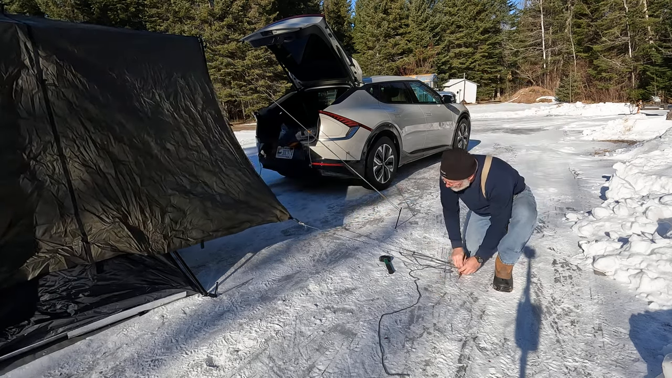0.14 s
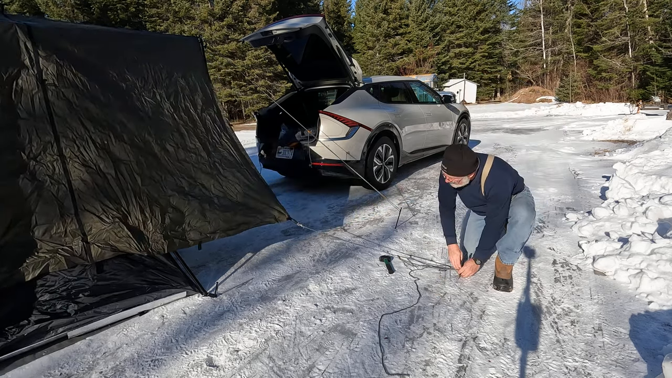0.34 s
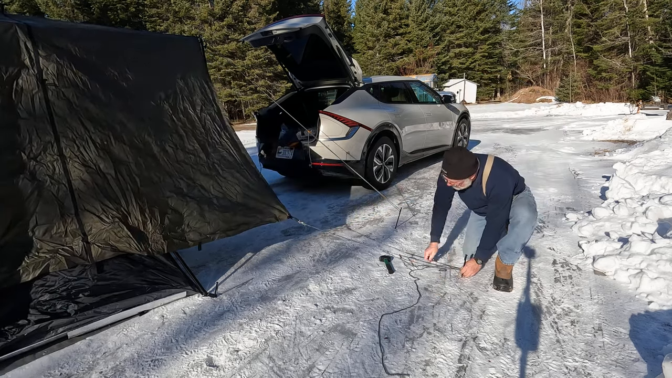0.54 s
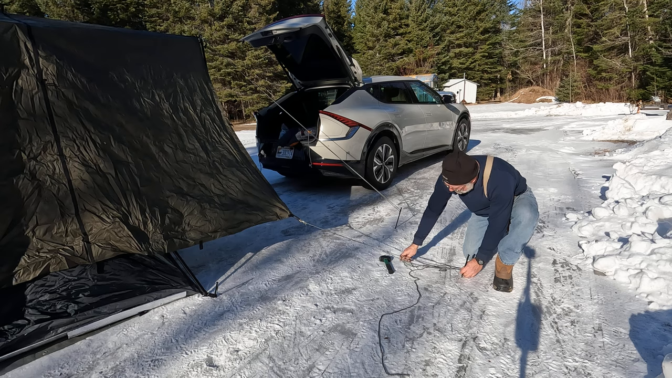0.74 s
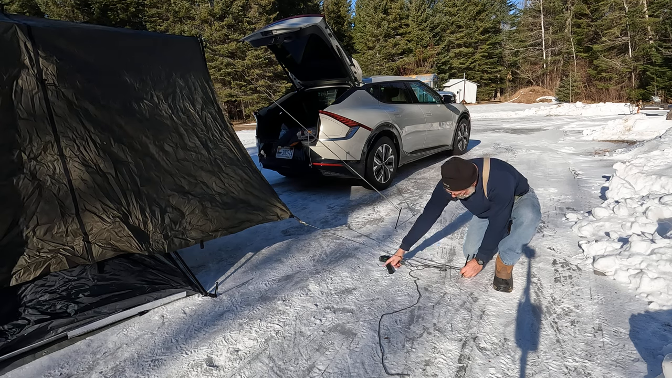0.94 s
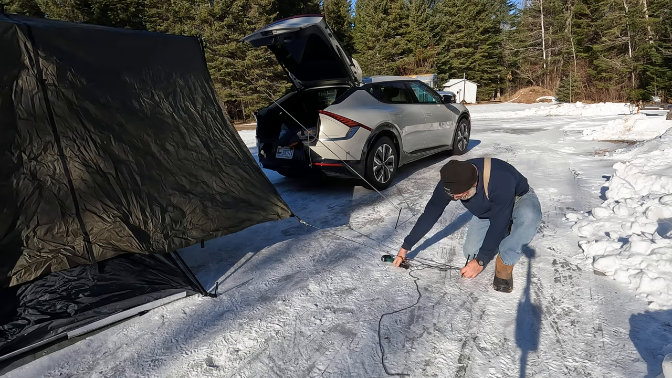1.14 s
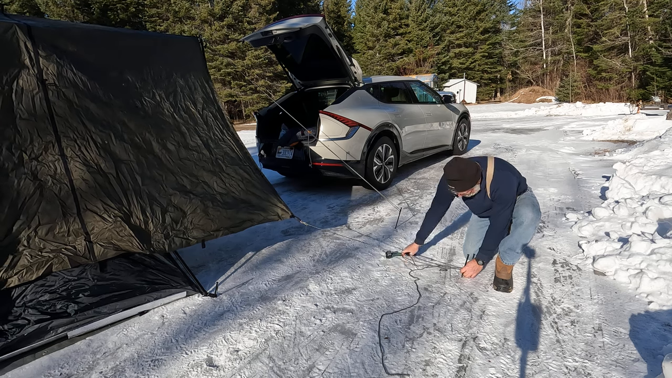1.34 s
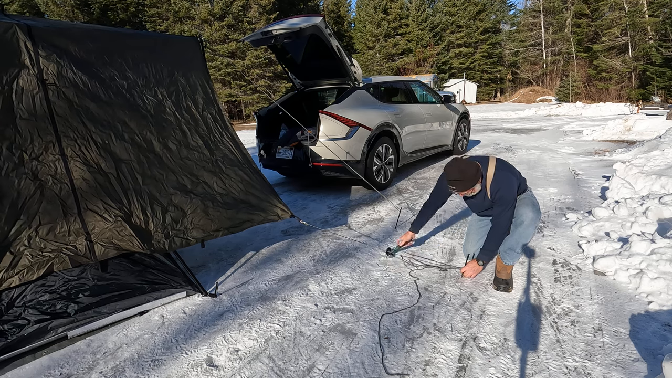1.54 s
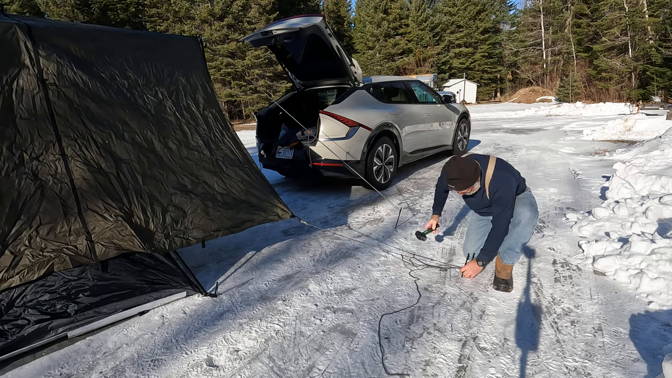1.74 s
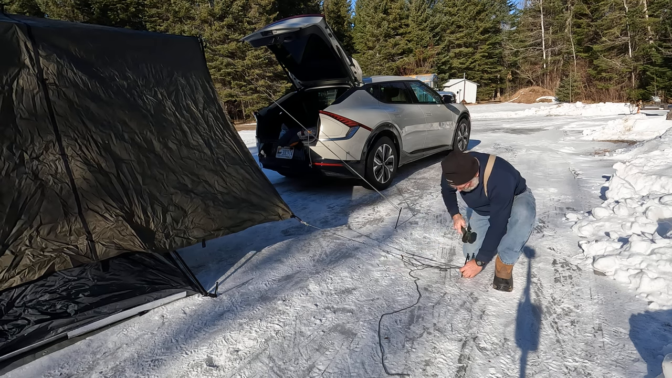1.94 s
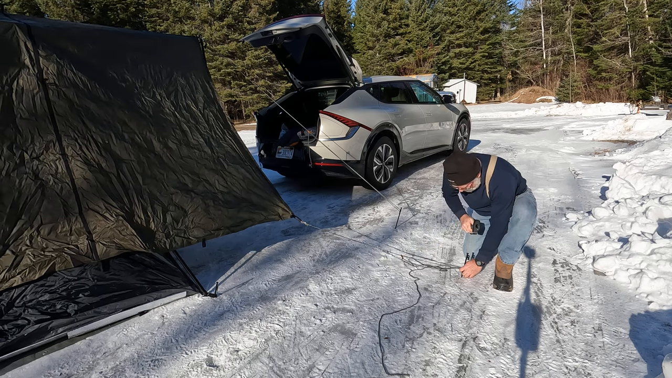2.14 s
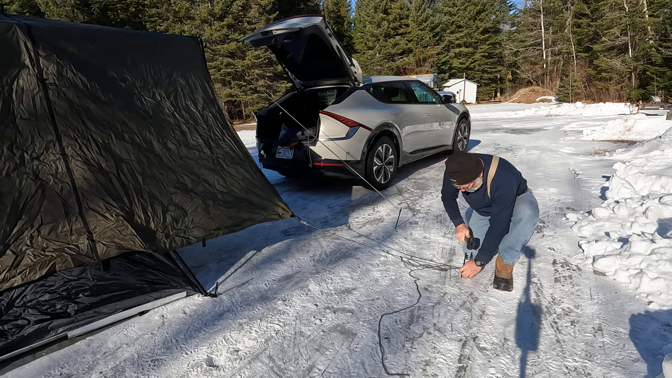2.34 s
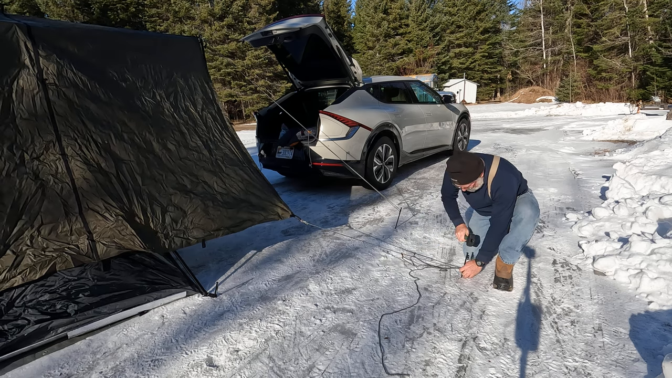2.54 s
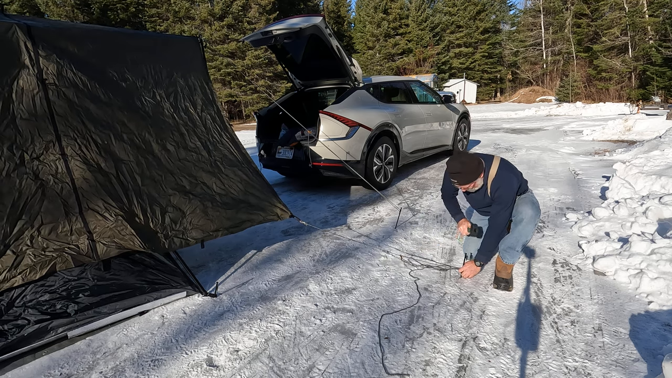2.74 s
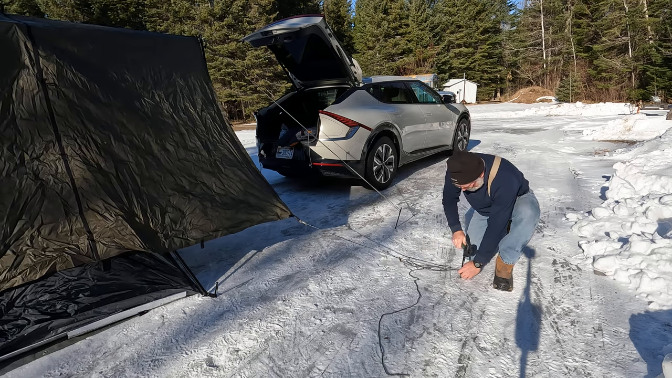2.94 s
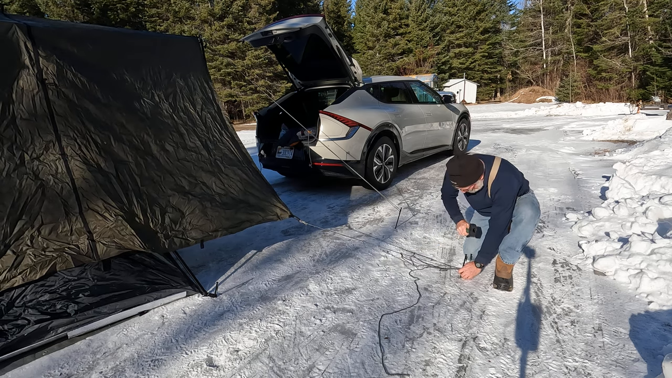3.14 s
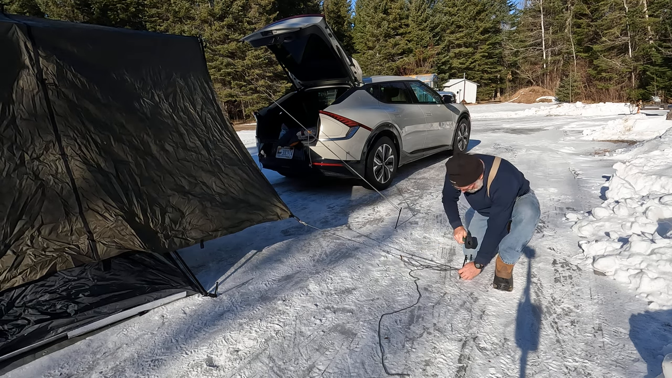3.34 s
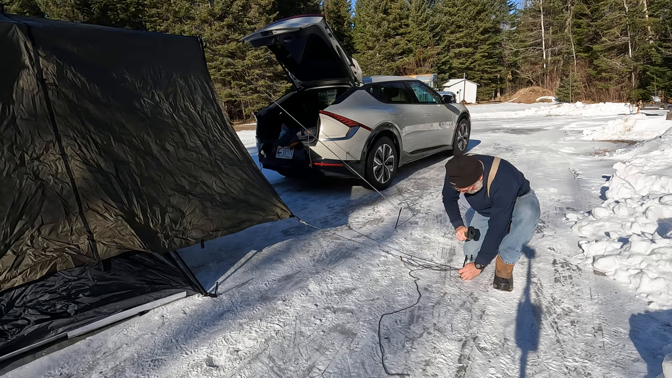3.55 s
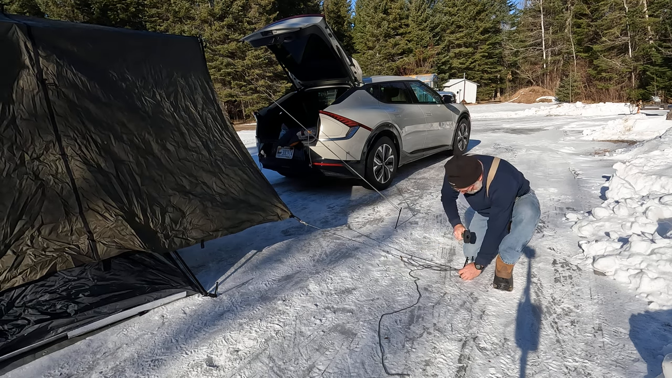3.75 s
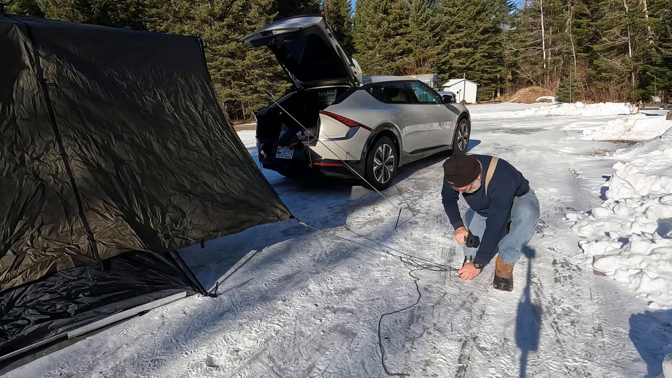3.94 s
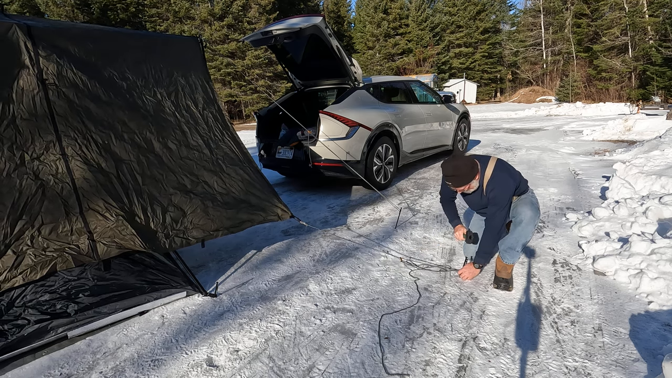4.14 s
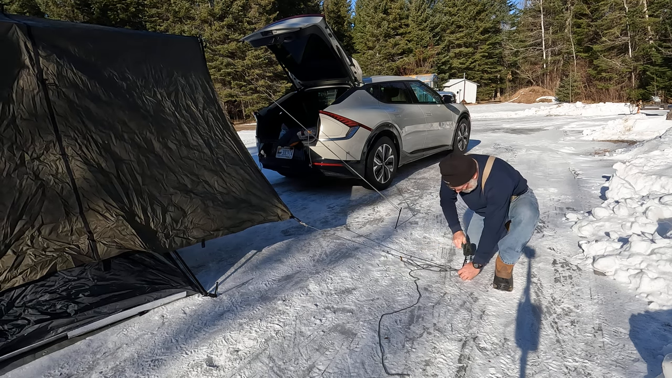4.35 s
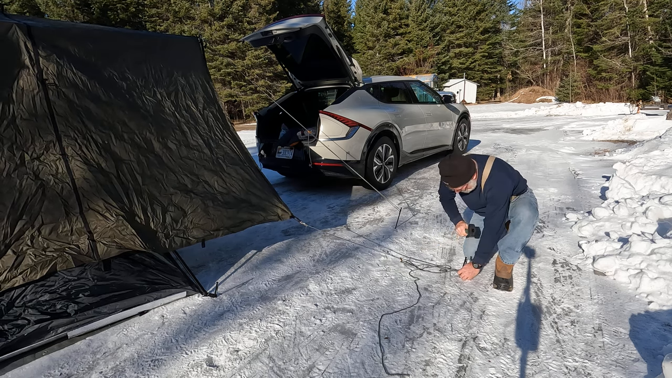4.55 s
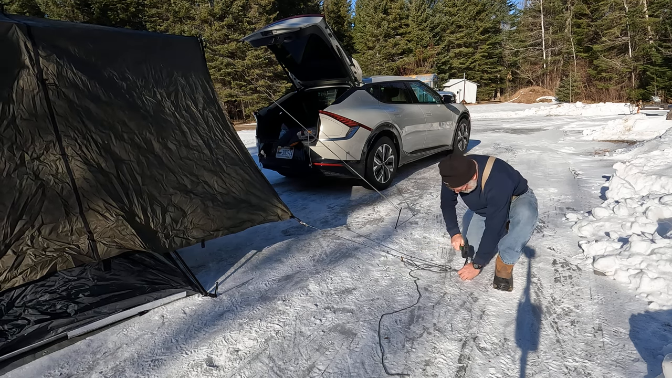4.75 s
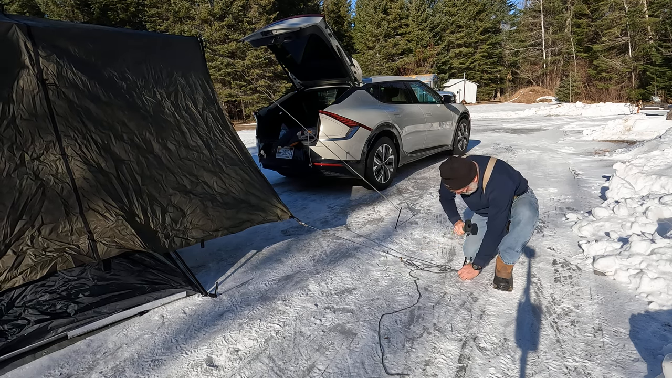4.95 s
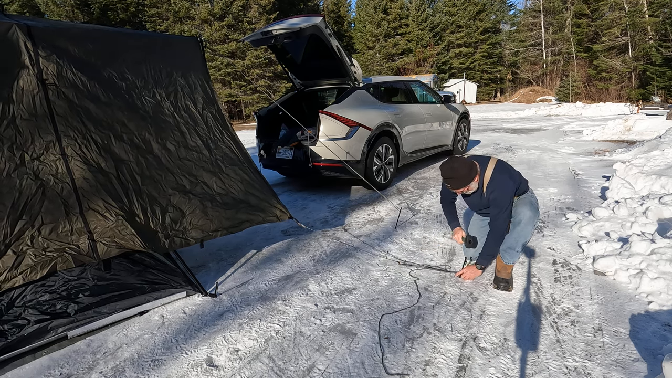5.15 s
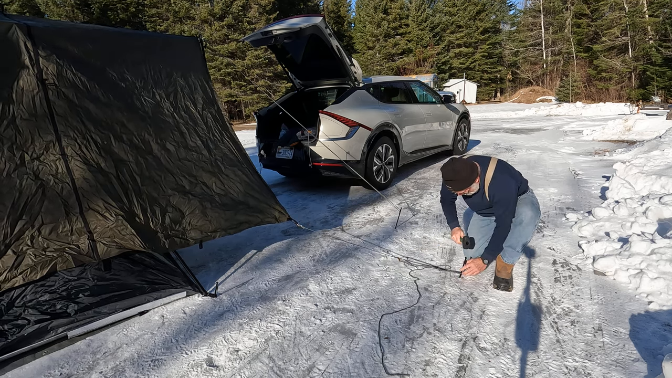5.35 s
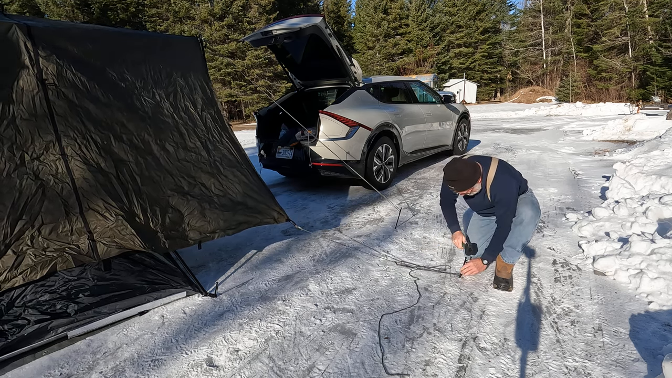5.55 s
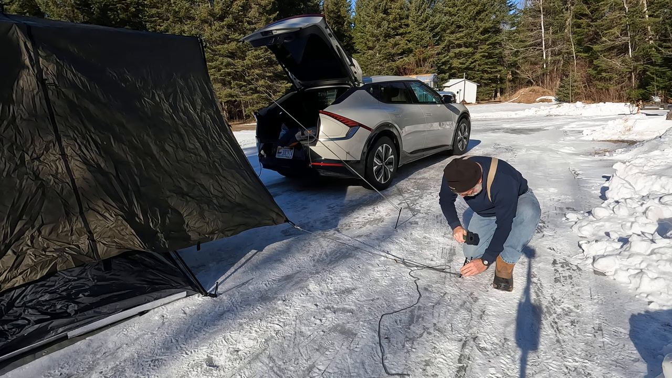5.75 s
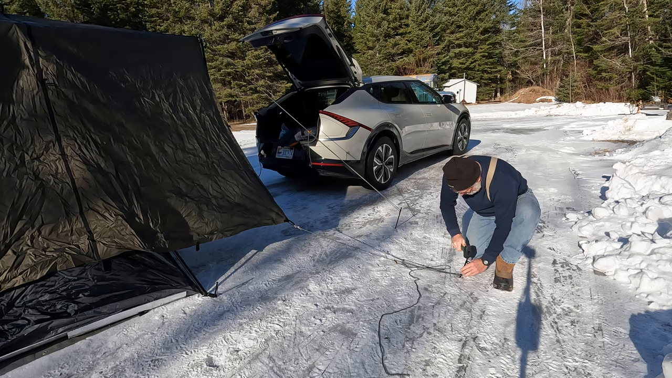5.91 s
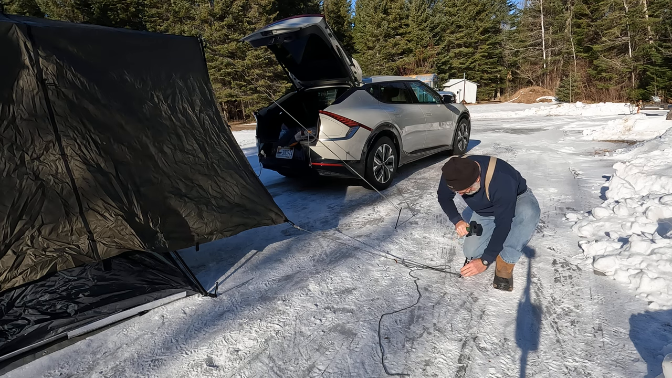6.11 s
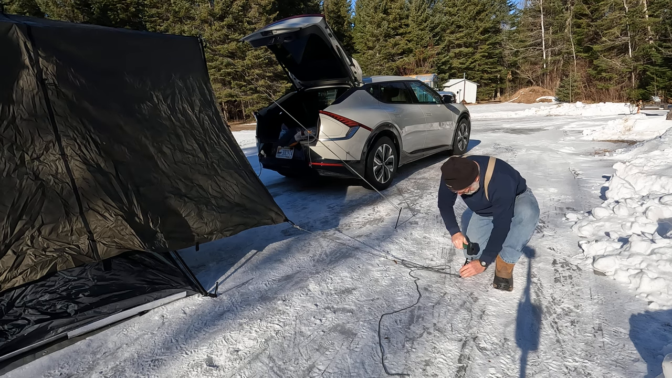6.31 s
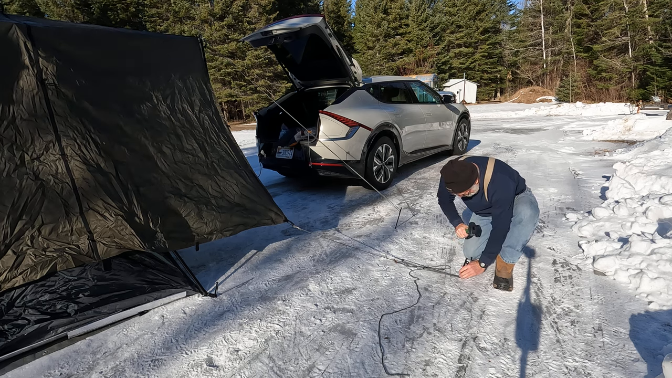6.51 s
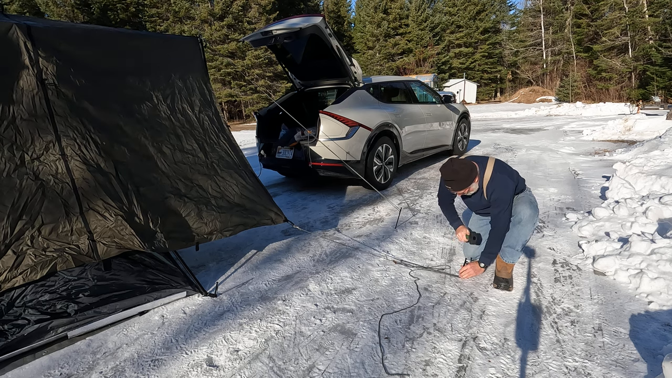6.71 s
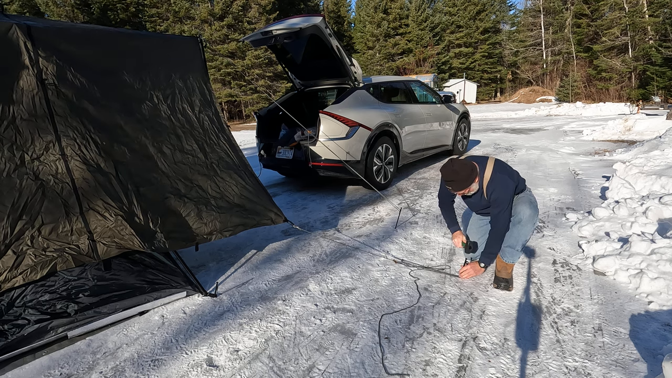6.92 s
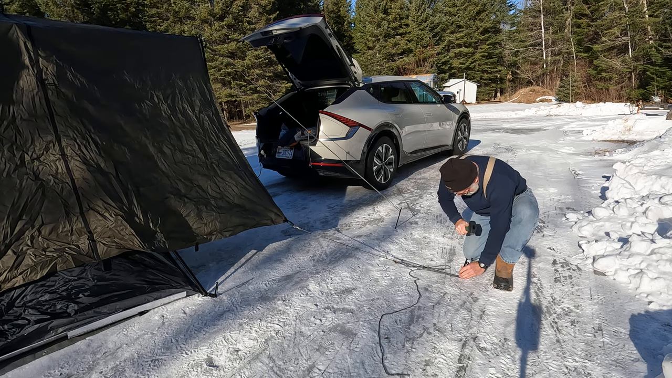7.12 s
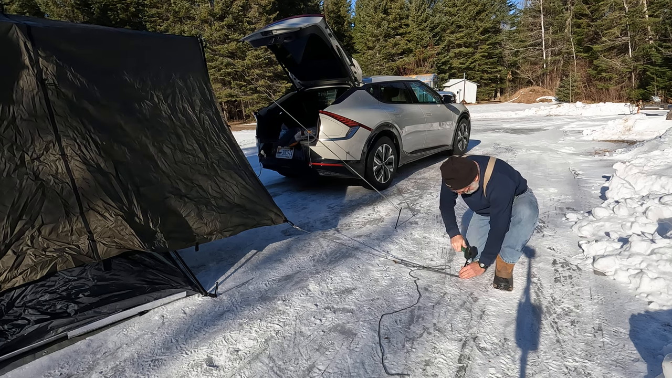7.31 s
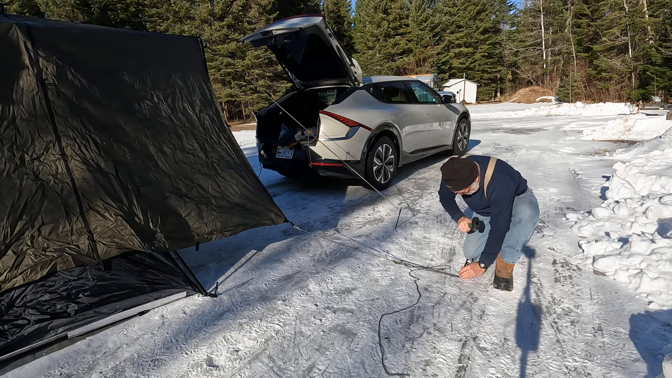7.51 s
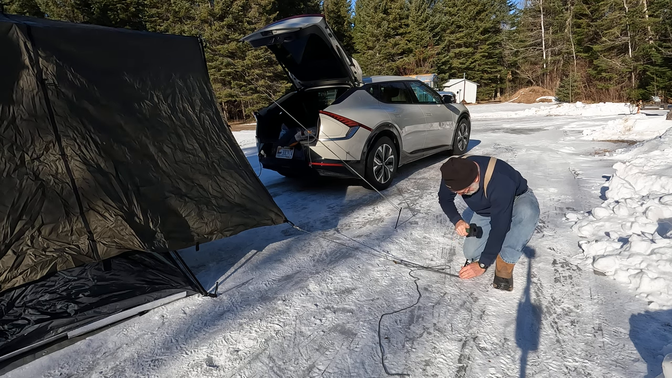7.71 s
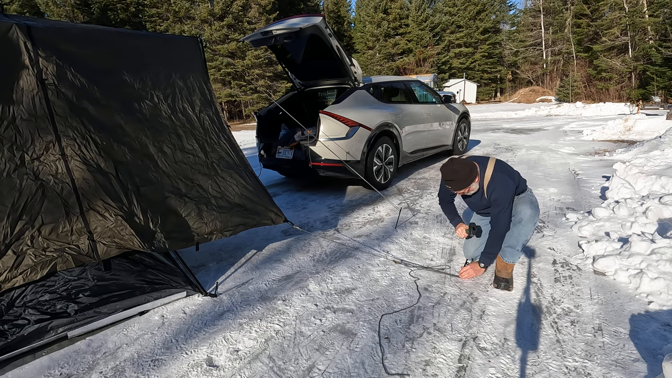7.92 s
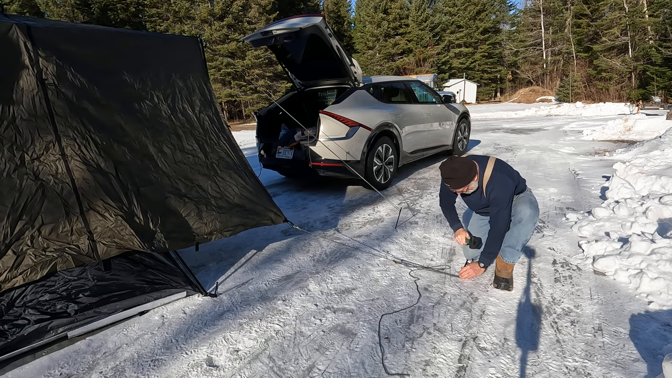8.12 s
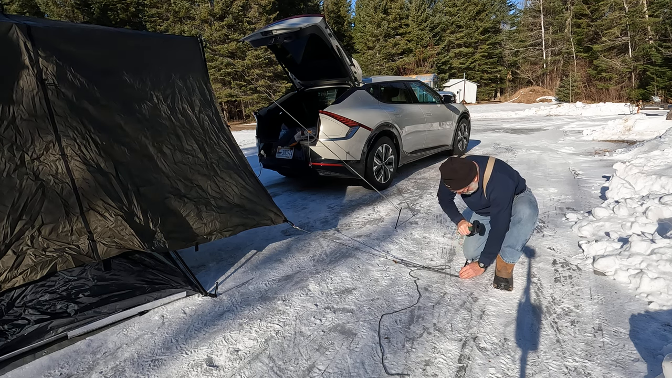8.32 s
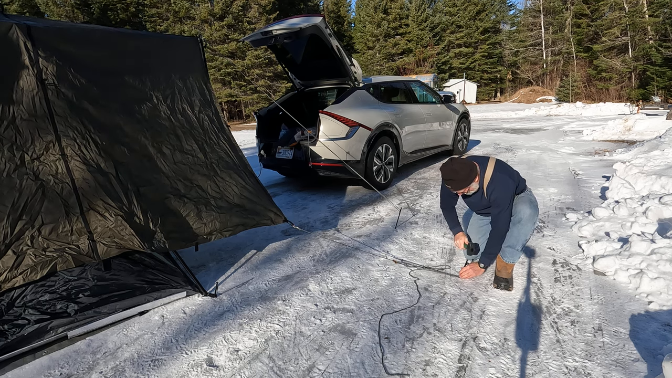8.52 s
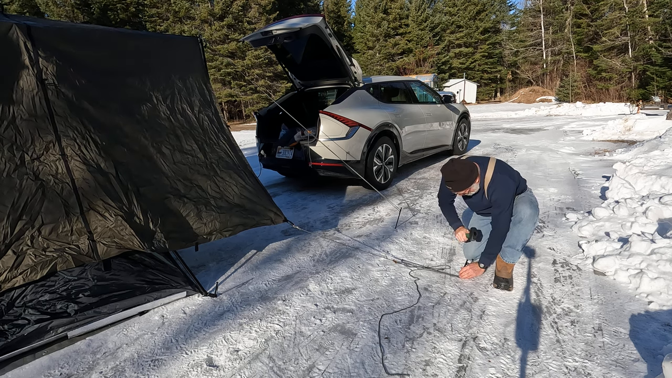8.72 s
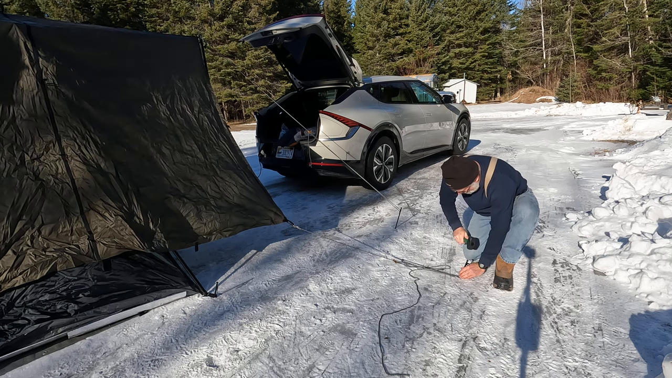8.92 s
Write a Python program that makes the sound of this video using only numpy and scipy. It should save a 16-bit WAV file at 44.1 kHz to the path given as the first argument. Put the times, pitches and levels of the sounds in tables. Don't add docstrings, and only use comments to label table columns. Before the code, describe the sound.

In an open snowy yard with far traffic humming, sleeves rustle, crust snaps and a hammer head scrapes briefly over ice. Then eight loud steel blows hit a stake, a pause brings crunching snow, five more follow, ice chips patter, and three last blows land. The close microphone distorts on each hit, on the left only; the right carries faint hiss.

```python
import sys
import numpy as np
from scipy import signal
from scipy.fft import rfft, irfft
from scipy.io import wavfile
from scipy.ndimage import uniform_filter1d

SR = 44100
rng = np.random.default_rng(int(sys.argv[2]) if len(sys.argv) > 2 else 0)


def bounce(signal):
    frames = np.transpose(np.atleast_2d(signal))
    limited = np.clip(frames, -1, 1)
    pcm = np.round(limited * 32767).astype(np.int16)
    wavfile.write(sys.argv[1], SR, pcm)


def boost_factor(decibels):
    exponent = np.asarray(decibels, float) / 20
    return 10 ** exponent


N = 395577
T = np.arange(N) / SR

# start [s], contact time [s], force over the overload point [dB],
# ground give [dB], crack [dB].
BLOWS = [(2.3498, 0.0037, 2.5, -26.5, -9.5), (2.6564, 0.01, 6, -26.5, -6), (2.9669, .0075, 11, -20, -6.5),
         (3.3212, .0056, 12.5, -25.5, -7), (3.6733, .0065, 13.5, -27.5, -3.5), (4.06, 0.0053, 12, -27, -5),
         (4.436, 0.0035, 14, -27, -2.5), (4.801, 0.0041, 12, -25.5, -2), (5.961, .0023, 9.5, -18.5, -4),
         (6.309, 0.0049, 10.5, -22.5, -3), (6.6731, .0033, 11, -17.5, -4), (7.012, 0.003, 14, -14, -3),
         (7.3712, .004, 13, -10, -3), (8.077, 0.004, 8.5, -8.5, -3), (8.5032, 0.0049, 10, -5, -3.5),
         (8.8598, .0048, 8, -7.5, -5.5)]
# low, middle and high mode [Hz],
# low mode level [dB], middle mode level [dB].
STAKE_RING = [(870, 1507, 4026, -2, 3.5), (907, 1528, 2497, 4.5, 5.5), (1098, 1700, 3660, 7.5, -2.5),
              (1210, 1500, 3000, 4, 3.5), (1286, 2142, 2670, 3, -4), (1098, 1636, 3500, -0.5, 1.5),
              (1320, 1550, 2400, -3, -2), (1640, 5700, 5146, 0, -3.5), (1750, 2153, 10023, -4.5, -4.5),
              (2110, 3800, 11000, -3.5, -6), (1290, 1400, 4489, -0.5, 0.5), (1625, 3100, 6700, -3.5, -2.5),
              (656, 2164, 3600, -2, 2), (680, 2368, 4000, 0, -0.8), (960, 1500, 2336, 5, -2),
              (846, 2400, 3531, 4, 0)]
# mode [Hz], level [dB].
CONTACT_MODES = [(530, -7), (2150, -7), (2550, -0.5), (3260, 2), (4400, -10), (5050, -6.5), (6800, -17.5),
                 (8700, -10.5), (10100, -9.5), (12300, -11.5)]
# mode [Hz], level [dB], decay by 60 dB [s].
HEAD_RING = [(2650, -12, .1), (3690, -2.5, 0.29), (4390, -5.5, .15), (4990, -5, 0.15), (5380, -9, 0.17),
             (6735, -8, 0.1), (8140, -9.5, .15), (8500, -11, .2), (10000, -4.5, .25), (10900, -10, .15),
             (11900, -8.5, 0.29), (12700, -11, .15)]
# frequency [Hz], level [dB per Hz].
ECHO_SPECTRUM = [(710, -35), (1200, -5), (2310, -0.5), (3350, -6), (3730, -1.5), (7650, -14.5),
                 (10100, -7.5), (15500, -22)]
# start [s], peak [dB], colour [Hz].
SNAPS = [(0.0485, -35.5, 5100), (0.3205, -35, 4070), (.373, -46, 10000), (1.0967, -42, 3270),
         (1.138, -28, 3870), (1.229, -31, 4000), (2.377, -31.5, 3960), (1.951, -45, 4000),
         (3.3993, -47, 8600), (3.5467, -42.5, 6250), (3.559, -47, 8700), (3.876, -47, 10000),
         (3.8913, -41, 7700), (3.906, -42, 8900), (4.208, -41, 10700), (4.2974, -49, 8700),
         (4.87, -43, 10500), (5.136, -25.5, 2680), (5.1443, -27.5, 10400), (5.152, -33, 11000),
         (5.1585, -27, 10600), (5.2001, -42, 9000), (5.213, -29, 4750), (5.2244, -40, 5660),
         (5.259, -40, 4920), (5.274, -34.5, 5100), (5.299, -38, 9900), (5.3477, -42, 10200),
         (6.464, -43, 5500), (6.487, -38, 5440)]
# start [s], peak [dB].
CHIPS = [(7.428, -23), (7.47, -30), (7.5004, -23), (7.537, -26), (7.583, -35), (7.6443, -21.5),
         (7.677, -45.5), (7.729, -27.5), (7.825, -42), (7.8884, -49), (8.028, -37.5), (8.1056, -20),
         (8.1284, -22.5), (8.184, -46)]
# start [s], length [s], level [dB], change over its length [dB], centre [Hz].
RUSTLE = [(.17, 0.26, -56, -0.5, 7000), (0.515, 0.1, -58, 4, 9000), (0.978, 0.19, -60, 10, 4500),
          (1.126, 0.12, -40.5, -5, 5430), (1.244, .1, -51.5, -11, 6000), (1.558, .095, -57.5, 9, 5700),
          (1.8, .18, -58, 10.5, 8060), (2.0, .3, -59, 2, 5000), (3.378, .24, -69.5, 7, 7640),
          (3.836, 0.14, -60, 12, 8540), (4.1, 0.17, -59, -2, 9000), (4.89, 0.23, -58.5, -6, 6000),
          (5.118, 0.064, -42, 1, 10000), (5.178, 0.29, -47.5, -11, 5300), (6.446, 0.087, -58, -1, 5600),
          (7.388, .13, -45, 2.5, 7000), (7.53, 0.074, -54, -5, 7000), (7.614, 0.14, -58, -2.5, 7000),
          (7.997, 0.095, -64, -1, 7800), (8.087, 0.046, -32, -12, 8000), (8.138, 0.065, -62, -10, 7000)]
# start [s], length [s], level [dB], tone [Hz].
SCRAPE = [
    (1.153, 0.067, -40.5, 2600),
    (1.227, .018, -30, 2560),
    (1.12, .12, -38.5, 580),
]
BOOT = 1.925, 0.079, -41.5
# start [s], length [s], level [dB].
WHINE = [
    (1.9, 0.39, -55.5),
    (3.94, 0.13, -53),
    (5.62, 0.39, -57.5),
]
# time [s], level [dB].
TRAFFIC_LEVEL = [(0, -37), (1, -40), (2, -38), (3, -38.5), (4, -35.5), (5, -36.5), (5.7, -37.5),
                 (6.5, -37.5), (7.5, -35.5), (8.2, -40.5), (9, -39)]
# frequency [Hz], level [dB per Hz].
TRAFFIC_SPECTRUM = [(8.8, -31.5), (15, -1.5), (28, -6), (75, 3), (146, -9), (303, -10.5), (455, -5),
                    (726, -2), (1380, -12.5), (2080, -23.5), (2270, -25.5), (2860, -32), (14700, -41.5),
                    (16000, -44)]
# frequency [Hz], level [dB per Hz].
CIRCUIT_SPECTRUM = [(8, 34.5), (16, 37.5), (45, 29), (100, 16.5), (200, 8.5), (500, -9.5), (1500, -2),
                    (5000, -1), (15600, -3), (16000, -6)]


def blows():
    out = np.zeros(N)
    t = T[:SR // 3]
    patchy_echo = coloured(ECHO_SPECTRUM) * boost_factor(2.5 * drift(60))
    for (s, pressed_s, _, give_db, crack_db), (*ring_hz, low_db, middle_db) in zip(BLOWS, STAKE_RING):
        i = round(s * SR) - len(t)
        echo_db = -42 + 0.4 * (give_db + 18)
        echo = boost_factor(echo_db) * patchy_echo[i:i + len(t)] * np.clip(t / 0.01, 0, 1) * fade(t, 0.29)
        knock_db = -8 + 1.5 * (give_db + 17.5)
        add(out, s, ground(t, knock_db, give_db) + head_ring(t) + echo)
        add(out, s, contact(T[:SR // 20], pressed_s, crack_db, ring_hz, [low_db, middle_db, 0.04]))
    return out


def contact(t, pressed_s, crack_db, ring_hz, ring_db):
    hz, level_db = np.transpose(CONTACT_MODES)
    uneven_db = 1.1 * rng.standard_normal(len(hz))
    head = chatter(t, hz, level_db + crack_db + uneven_db, 0.17).sum(axis=0)
    stake = chatter(t, np.array(ring_hz), np.array(ring_db), 0.045).sum(axis=0)
    crack = boost_factor(crack_db + 4.5) * band(rng.standard_normal(len(t)), 1200, 12000)
    release = fade(np.maximum(t - 0.74 * pressed_s, 0), 0.01)
    return boost_factor(-1.5) * (head + stake + crack) * fade(t, 0.035) * release


def ground(t, knock_db, heave_db):
    late = np.maximum(t - 0.0035, 0) / 0.0017
    heave = -boost_factor(heave_db) * late * np.exp(1 - late)
    heave = signal.sosfilt(signal.butter(1, 25.0, "high", fs=SR, output="sos"), heave)
    swing = boost_factor(knock_db - 28) * (t / 0.064) ** 2 * np.exp(2 - 2 * t / 0.031)
    thump = mode(t, 190, heave_db + 4.0, 0.029)
    knock = mode(t, 356, knock_db + 4.0, 0.011)
    return heave + swing + thump - knock


def head_ring(t):
    hz, level_db, t60 = np.transpose(HEAD_RING)
    detuned_hz = hz * (1 + 0.008 * rng.standard_normal(len(hz)))
    uneven_db = level_db - 45.5 + 4 * rng.standard_normal(len(hz))
    modes = chatter(t, detuned_hz, uneven_db, 0.13)
    return (modes * fade(t, t60[:, None])).sum(axis=0)


def snaps():
    out = np.zeros(N)
    t = T[:SR // 25]
    rows = [(s, peak_db, hz, 1.04) for s, peak_db, hz in SNAPS]
    chip_hz, rebound_s, rebound_loss_db = 2390, 0.014, 24
    for s, peak_db in CHIPS:
        rows.append((s, peak_db, chip_hz, 1))
        rows.append((s + rebound_s, peak_db - rebound_loss_db, 2 * chip_hz, 1))
    for s, peak_db, hz, colour in rows:
        grit = rng.standard_normal(len(t)) * fade(t, 0.0079)
        click = 0.5 * band(grit, 1300, 14000)
        rattle = colour * band(grit, hz / 1.214, hz * 1.19)
        add(out, s, boost_factor(peak_db + 9.0) * (click + rattle))
    return out


def rustle():
    sizes = boost_factor(4.5 * np.minimum(rng.exponential(1, N), 4)) * rng.choice([-1, 1], N)
    sparse = sizes * (rng.random(N) < 2000 / SR)
    grains = rms_one(sparse) + 0.7 * rng.standard_normal(N)
    centres = np.geomspace(2300, 14000, 9)
    bands = []
    for hz in centres:
        part = rms_one(band(grains, hz / 1.12, hz * 1.12)) * np.sqrt(hz / 16000)
        bands.append(part * boost_factor(1.8 * drift(33) - 2.1 * np.log2(hz / 5000)))
    bands = np.array(bands)
    out = np.zeros(N)
    for s, length, level_db, change_db, centre_hz in RUSTLE:
        on = slice(round(s * SR), round((s + length) * SR))
        peak = np.exp(-(np.log2(centres / centre_hz) / 0.51) ** 2)
        level = boost_factor(level_db + change_db * (T[on] - s) / length)
        out[on] += swell(s, length, 0.0072)[on] * level * (boost_factor(1.55 * peak) @ bands[:, on])
    return out


def scrape():
    return sum(narrow(hz / 1.022, hz * 1.022, [row], 0.008) for *row, hz in SCRAPE)


def boot():
    return narrow(250, 1700, [BOOT], 0.025)


def whine():
    return narrow(2150, 2450, WHINE, 0.083)


def traffic():
    level_db = np.interp(T, *np.transpose(TRAFFIC_LEVEL)) + 1.0 * drift(3.4)
    return boost_factor(level_db) * coloured(TRAFFIC_SPECTRUM)


def circuit():
    buzz_hz = 470.55
    buzz = np.zeros(N)
    for k in range(1, 17):
        buzz += boost_factor(-1.0 * max(k - 5, 0)) * np.sin(2 * np.pi * k * buzz_hz * T + k * k)
    return boost_factor(-54.0) * coloured(CIRCUIT_SPECTRUM) + boost_factor(-79.5) * buzz


def chatter(t, hz, level_db, wander):
    phase = np.cumsum(wander * rng.standard_normal((len(hz), len(t))), axis=1)
    return boost_factor(level_db)[:, None] * np.sin(2 * np.pi * hz[:, None] * t + phase)


def mode(t, hz, level_db, t60):
    return boost_factor(level_db) * np.sin(2 * np.pi * hz * t) * fade(t, t60)


def fade(t, t60):
    return boost_factor(-60 * t / t60)


def swell(s, length, edge):
    return np.clip(np.minimum(T - s, s + length - T) / edge, 0, 1)


def narrow(low_hz, high_hz, rows, edge):
    tone = rms_one(band(rng.standard_normal(N), low_hz, high_hz))
    return tone * sum(boost_factor(db) * swell(s, length, edge) for s, length, db in rows)


def band(x, low_hz, high_hz):
    edges = np.clip([low_hz, high_hz], 10, 0.45 * SR)
    return signal.sosfilt(signal.butter(2, edges, "band", fs=SR, output="sos"), x)


def coloured(points):
    hz = np.maximum(np.arange(N // 2 + 1) * SR / N, 5)
    point_hz, point_db = np.transpose(points)
    shape_db = np.interp(np.log(hz), np.log(point_hz), point_db)
    return rms_one(irfft(rfft(rng.standard_normal(N)) * boost_factor(shape_db), N))


def drift(rate_hz):
    r = np.exp(-2 * np.pi * rate_hz / SR)
    return rms_one(signal.lfilter([1], [1, -2 * r, r * r], rng.standard_normal(N + SR))[SR:])


def rms_one(x):
    return x / np.sqrt(np.mean(x ** 2) + 1e-20)


def add(out, s, sound):
    i = round(s * SR)
    out[i:i + len(sound)] += sound[:N - i]


def gain_control():
    hold_s, recover_db_per_s = 0.068, 21.5
    duck_db = np.zeros(N)
    for s, _, force_db, *_ in BLOWS:
        since = T - s
        ramp = np.clip((since + 0.02) / 0.014, 0, 1)
        recovered_db = recover_db_per_s * np.maximum(since - hold_s, 0)
        duck_db = np.maximum(duck_db, force_db * ramp - recovered_db)
    return boost_factor(-duck_db)


def scene():
    near = blows() + snaps() + rustle() + scrape() + boot() + whine()
    return np.array([near / gain_control() + traffic(), circuit()])


def top_cut(x):
    return signal.sosfilt(signal.butter(12, 16940, fs=SR, output="sos"), x)


def record(dry):
    top_hz = 16150
    x = signal.sosfilt(signal.cheby2(10, 50, top_hz, fs=SR, output="sos"), dry) * gain_control()
    ahead = sum((T > s - 0.016) & (T < s - 0.0005) for s, *_ in BLOWS)
    dimmed = 0.64 * uniform_filter1d(1.0 * ahead, size=60)
    bass = signal.sosfiltfilt(signal.butter(3, 2000, fs=SR, output="sos"), x[0])
    x[0] -= dimmed * (x[0] - bass)
    x = x / (1 + np.abs(x) ** 6) ** (1 / 6)
    return top_cut(0.98 * x)


dry = scene()
out = record(dry)
bounce(out)
```